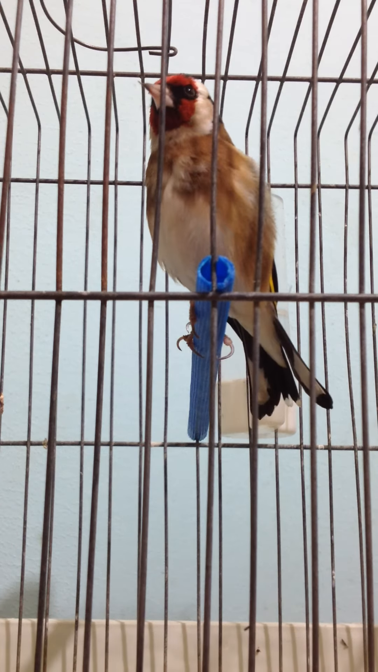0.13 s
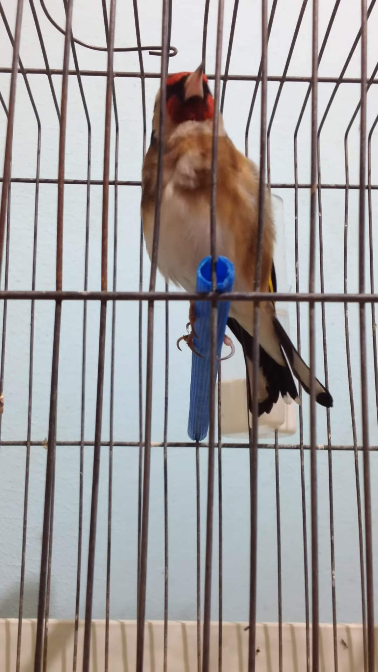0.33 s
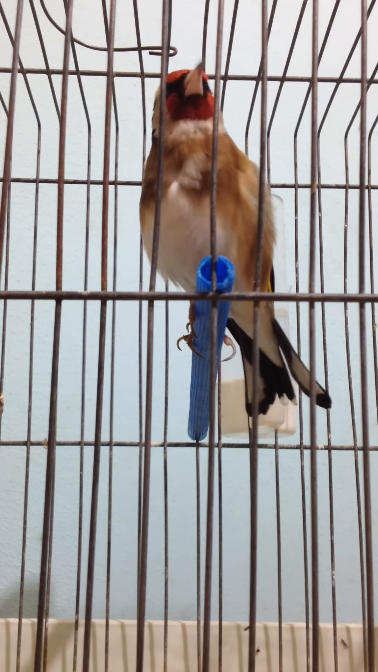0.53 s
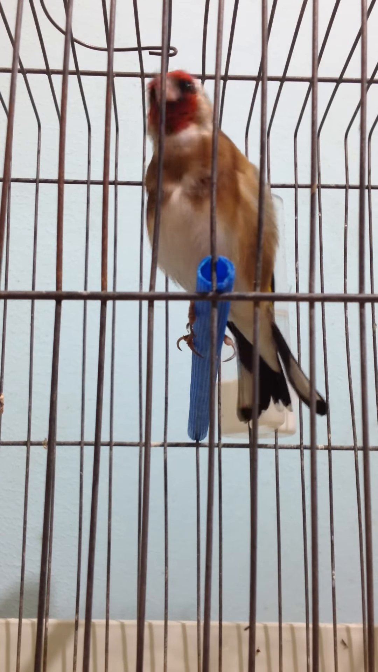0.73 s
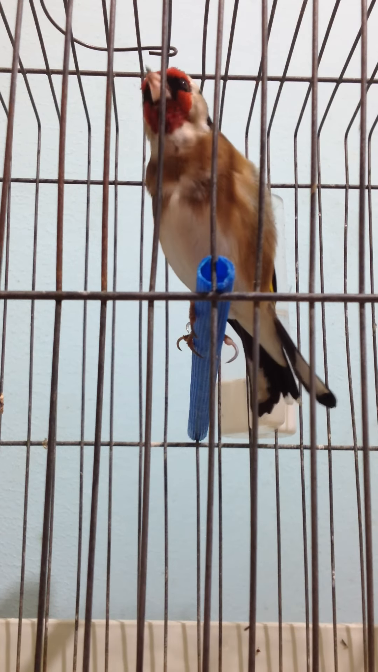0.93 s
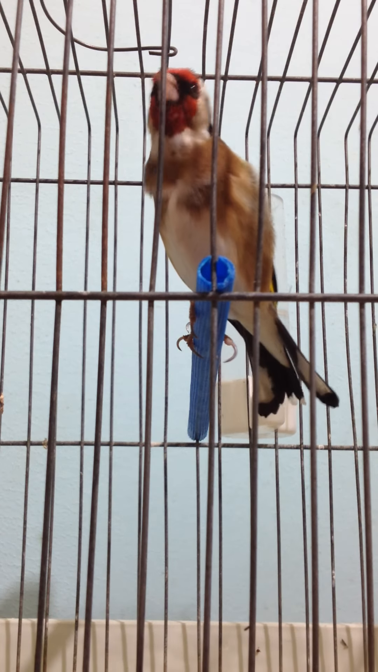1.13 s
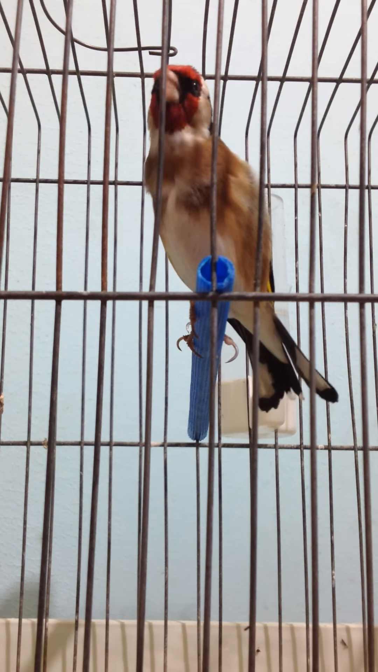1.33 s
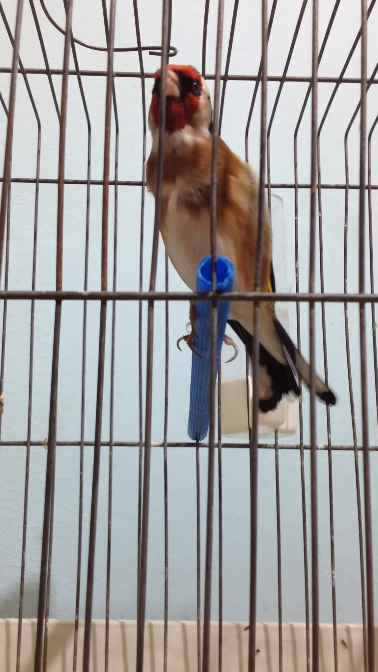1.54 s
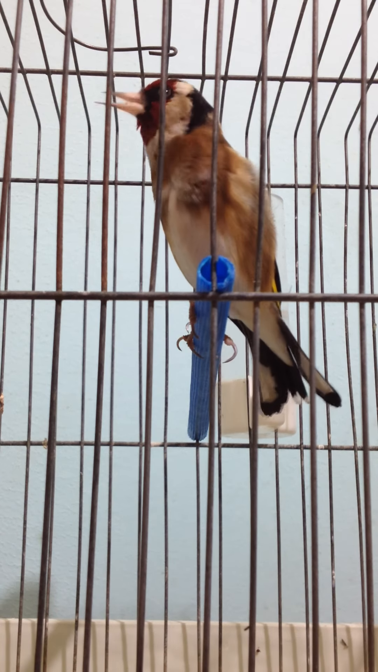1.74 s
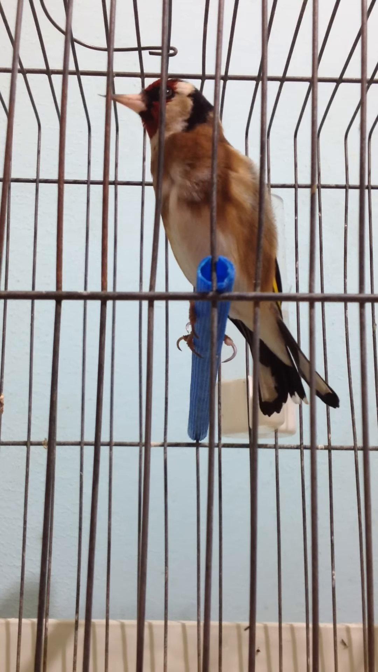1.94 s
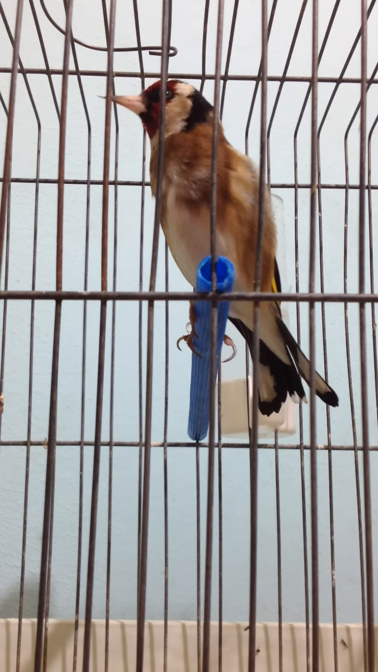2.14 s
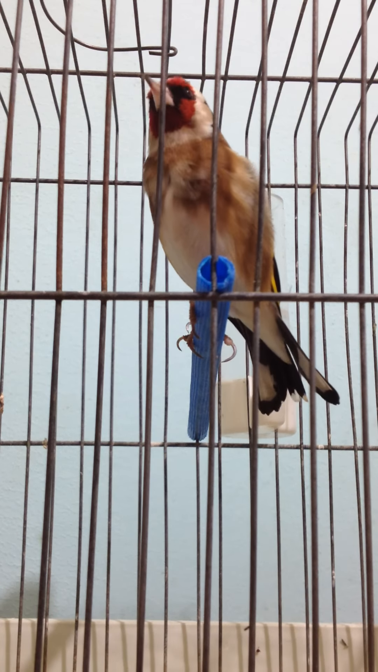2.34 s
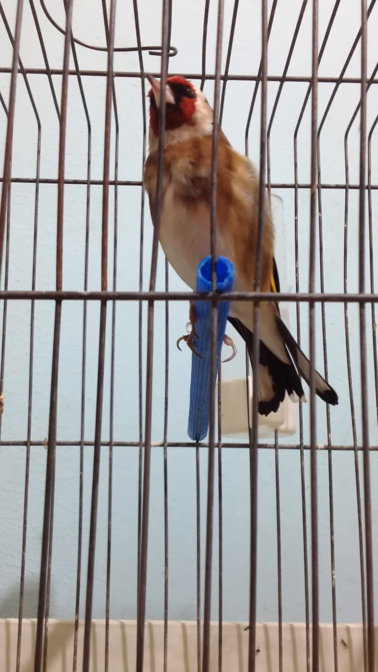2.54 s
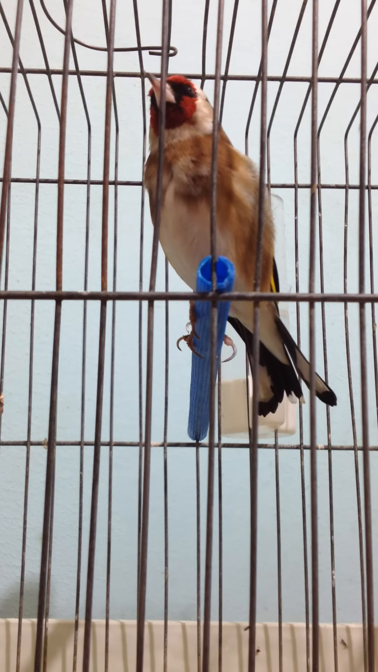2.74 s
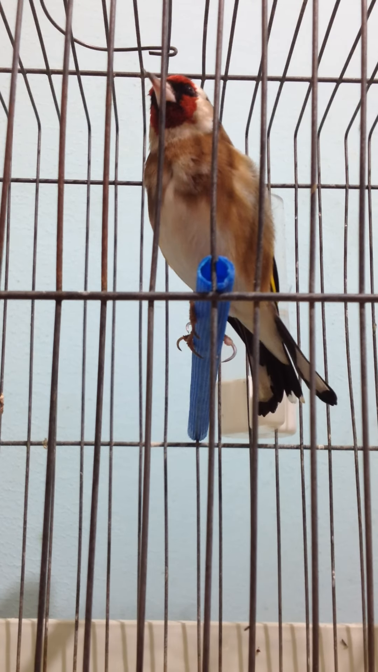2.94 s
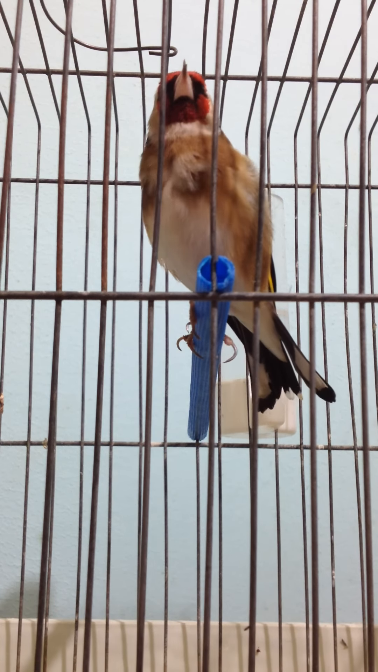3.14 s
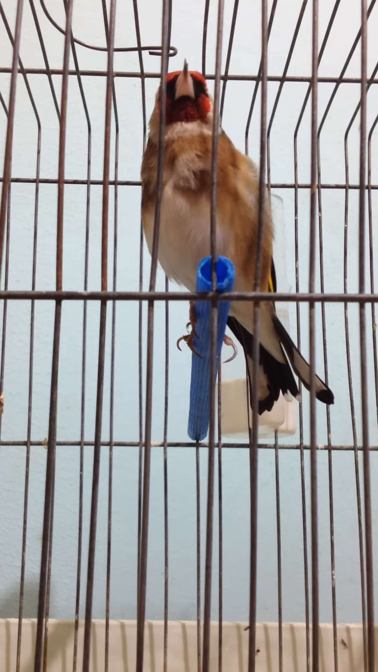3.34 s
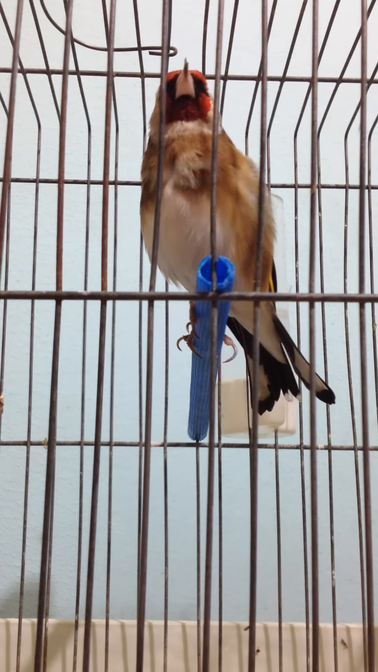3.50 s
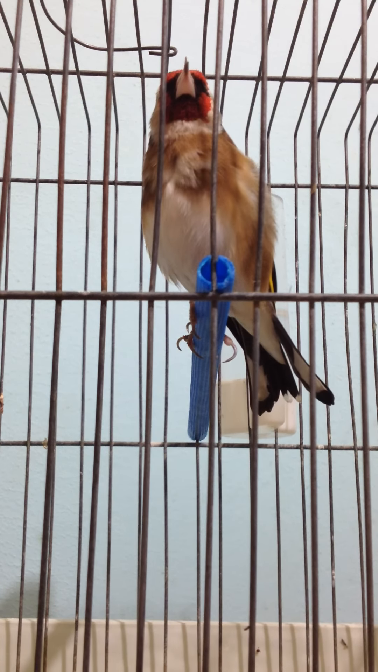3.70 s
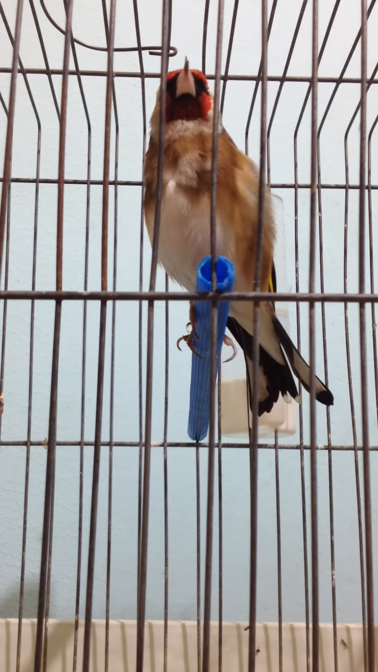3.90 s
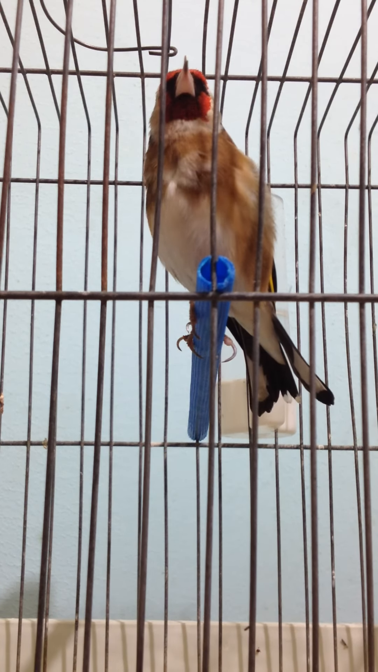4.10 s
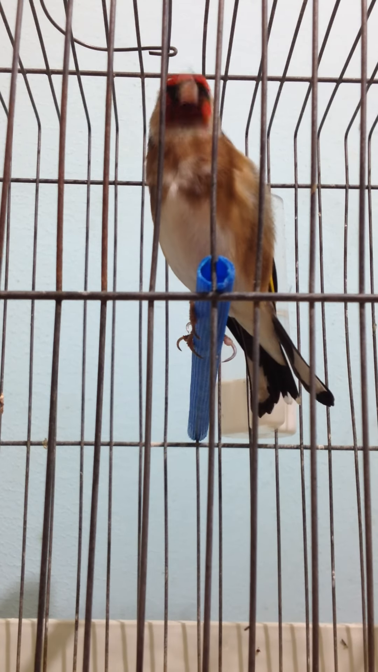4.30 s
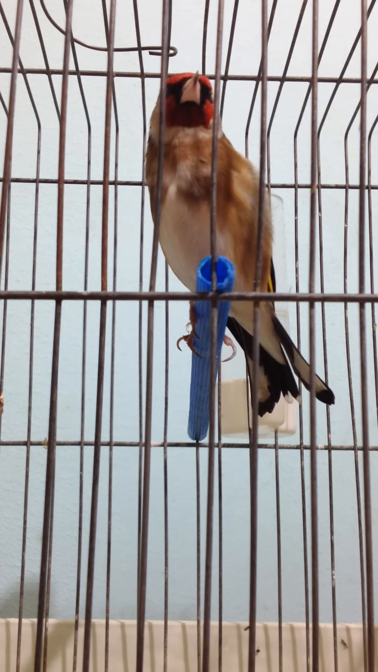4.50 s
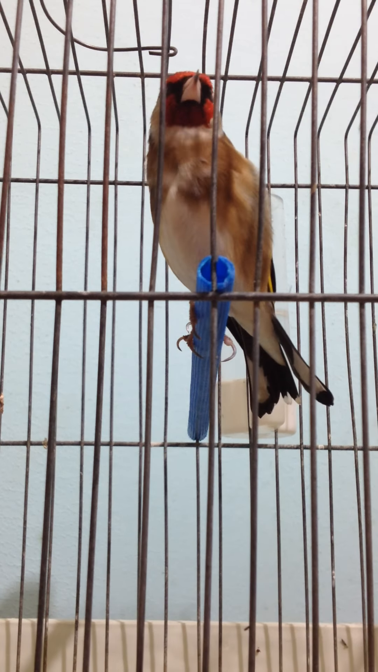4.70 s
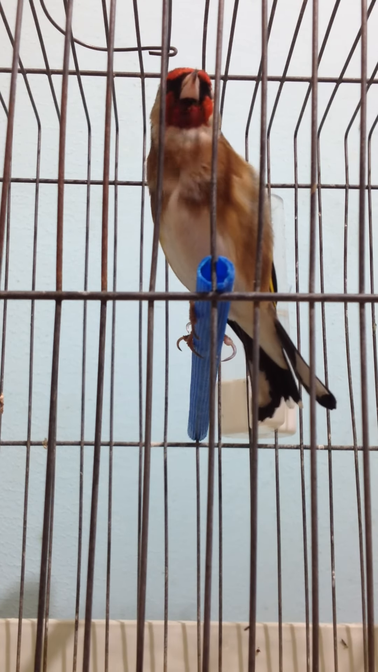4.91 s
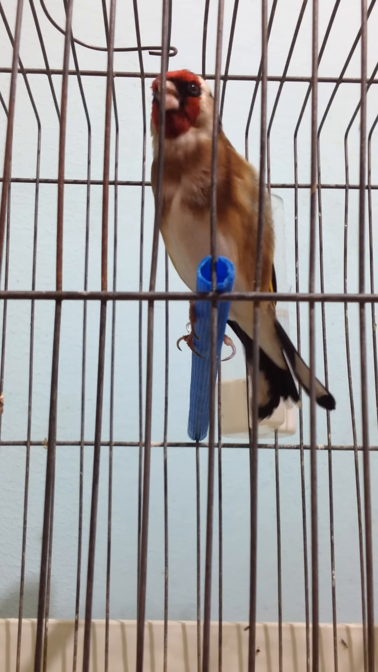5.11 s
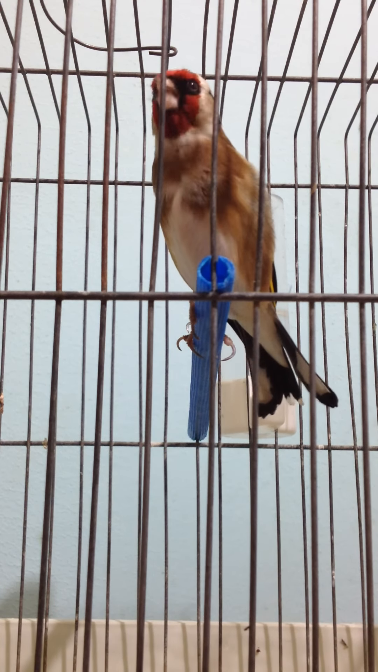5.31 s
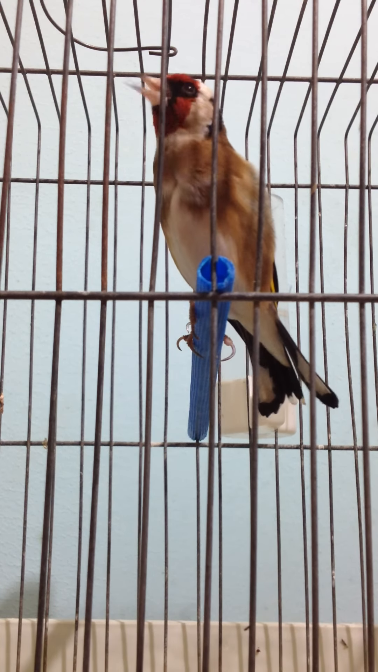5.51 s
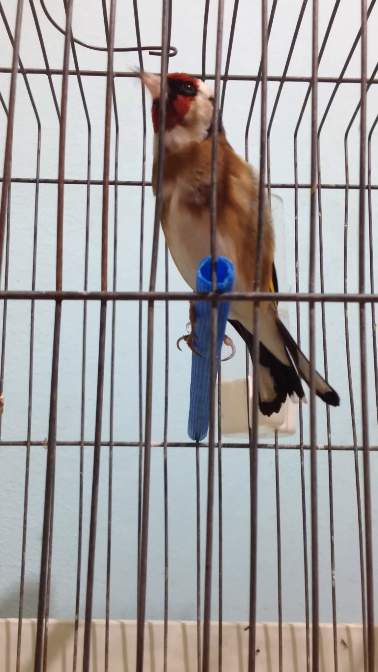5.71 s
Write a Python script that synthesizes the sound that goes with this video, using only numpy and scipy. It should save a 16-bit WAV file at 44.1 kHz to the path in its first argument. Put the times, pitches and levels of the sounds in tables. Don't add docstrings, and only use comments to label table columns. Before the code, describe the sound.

Indoors and close up, a small songbird gives two loud, crisp phrases with short bright reflections. The first is an even run of steeply falling notes and a buzzy finish; the second is a rapid jumble of chirps, rising flicks and double-toned whistles. Between them, far birds twitter from beyond another room, muffled knocks sound and the cage ticks, over soft steady hum.

```python
import sys
import numpy as np
from scipy import signal
from scipy.io import wavfile
from scipy.ndimage import uniform_filter1d

SR = 44100
rng = np.random.default_rng(int(sys.argv[2]) if len(sys.argv) > 2 else 0)


def persist_wave(psi):
    counts = np.round(np.clip(psi, -1, 1) * 32767).astype(np.int16)
    wavfile.write(sys.argv[1], SR, np.atleast_2d(counts).T)


def natural_amplitude(level_db):
    exponent = np.asarray(level_db, float) / 20
    return 10 ** exponent


N = 253575

# (frequency [Hz], density [dB per Hz])
HUM_SPECTRUM = [(20, -68.5), (60, -36.5), (110, -17), (190, -3), (300, -8), (550, -9), (900, -16),
                (1700, -19.5), (3200, -20.5), (7000, -27), (9000, -33), (13000, -26), (16000, -23.5)]

# (time [s], level [dB])
CHATTER = [(0, -85), (.14, -74), (.5, -68.5), (2.0, -65), (2.25, -74), (2.7, -88), (2.95, -88), (3.1, -76),
           (3.9, -69.5), (4.8, -68.5)]
# (frequency [Hz], width [Hz], level [dB])
CHATTER_BANDS = [(4050, 700, -4), (4600, 1200, 0), (5250, 500, -7), (5800, 900, -2), (6500, 450, -6)]
# (time [s], peak [dB], low voice [Hz], high voice [Hz], high voice level [dB])
CHIRPS = [(0.3486, -57, 5140, 5620, 2), (0.4594, -60.5, 4800, 6100, 4), (2.199, -62, 4630, 6060, -11.5),
          (2.2994, -62, 4190, 5490, -12.5), (2.4996, -63.5, 4330, 5550, -1.5),
          (2.8192, -63, 4725, 5850, -6), (3.0486, -64, 3960, 5850, -4.5), (3.1483, -62.5, 4840, 5660, -1.5),
          (3.2987, -55, 4503, 6480, -7.5), (3.5508, -51.5, 4730, 5620, -12.5),
          (3.7797, -51.5, 4580, 6460, -9), (3.9984, -55, 4910, 6070, 5), (4.0789, -50.5, 4150, 5910, -20.5),
          (4.2474, -53, 4140, 6500, -14), (4.4987, -59, 4710, 5880, 6), (4.6478, -60, 4900, 5620, -13),
          (4.7586, -62.5, 4357, 5820, -5.5)]
# (kind, start [s], length [s], from [Hz], to [Hz], level [dB])
WHISTLES = [
    ("ping", .128, .042, 4720, 4800, -51),
    ("ping", .128, .042, 6080, 6500, -50),
    ("far", 3.81, .22, 5800, 6720, -47.5),
    ("far", 4.29, .21, 6100, 6600, -47.5),
    ("sag", 4.36, 0.12, 4040, 3850, -60),
    ("slide", 2.19, .05, 4500, 4500, -64),
    ("climb", 2.25, .1, 4200, 2850, -67),
]

# (time [s], peak [dB], brightness [dB])
KNOCKS = [(0.019, -61.5, -23), (0.269, -61, -4.5), (0.599, -69, -15), (0.713, -64.5, -12),
          (0.919, -61.5, 2), (1.034, -61.5, -4), (1.139, -64, 0), (1.245, -71, -15), (2.276, -58.5, -11.5),
          (2.38, -59, -18), (2.43, -58, -16), (2.499, -68.5, -14), (2.57, -64, -15), (2.613, -60, -4.5),
          (2.68, -64, -15), (3.1, -62, -10), (3.241, -59, -11), (3.319, -59, -6), (3.699, -70.5, -13.5),
          (4.025, -63.5, -9), (4.113, -55, -16.5), (4.147, -51, -11), (4.2, -56, -12), (4.27, -66, -15),
          (4.45, -65, -15)]
# (frequency [Hz], width [Hz], level [dB])
KNOCK_BODY = [(345, 45, 0), (485, 30, 4), (540, 30, -2), (595, 24, 5), (657, 30, 3), (620, 200, -3),
              (925, 70, -5), (1200, 60, -13), (1330, 50, -12), (1790, 110, -15)]
# (time [s], peak [dB])
TICKS = [
    (2.6479, -57),
    (4.5295, -53),
]

FALLS = {"short chord": (5, 1, .35, .5, -12, -16), "slide": (2.1, 1, .6, .75, -7, -15),
         "sag": (2.7, 1, .2, .3, -10, -8), "flick": (2.1, 1, .35, .4, -15, -10),
         "plunge": (.8, 1, .45, .85, -9, -3), "ping": (1.1, 1, .2, .3, -8, -14)}
RISES = {"rise": (1.9, 1, .8, .9, -24, -8), "climb": (1.3, 1, .6, .8, -12, -20),
         "scoop": (2.8, 1, .76, .8, -28, -22), "level": (4, 1, .6, .85, -28, -5),
         "leap": (4.5, 1, .42, .62, -28, -15), "whip": (1.1, 1, .9, .95, -30, -1),
         "jump": (5, 1, .55, .7, -34, -12), "blip": (1.4, 2, .4, .55, -14, -12),
         "far": (2.8, 1.5, .25, .65, -18, -14)}

# (kind, start [s], length [s], from [Hz], to [Hz], level [dB])
UPPER_FIRST = [
    ("whip", .528, .012, 3380, 7600, -16),
    ("short chord", .5355, .025, 6600, 6230, -10),
    ("blip", .638, .011, 4050, 3980, -25),
    ("ping", .651, .011, 4070, 3980, -17),
    ("blip", .737, .008, 6100, 6290, -50),
    ("ping", 1.659, .011, 7850, 7650, -30),
    ("plunge", 1.667, .021, 7750, 5550, -25.5),
]
# (kind, start [s], length [s], from [Hz], to [Hz], level [dB])
UPPER_SECOND = [
    ("ping", 4.823, .011, 4083, 3937, -29),
    ("whip", 4.877, .025, 2330, 2890, -32),
    ("ping", 5.019, .006, 4100, 3900, -28),
    ("whip", 5.243, .016, 1175, 4300, -23),
    ("blip", 5.594, .01, 5950, 6200, -16),
    ("jump", 5.623, .0095, 2750, 4100, -9),
    ("ping", 5.633, .007, 4120, 4000, -13),
    ("blip", 5.723, .011, 5950, 6130, -19),
]
# (kind, start [s], length [s], from [Hz], to [Hz], level [dB])
LOWER_FIRST = [
    ("short chord", .535, .025, 5500, 5065, -20),
    ("climb", .629, .025, 2769, 3850, -18),
    ("leap", .678, .034, 1920, 2155, -37),
    ("rise", 1.498, .059, 1261, 2316, -35),
    ("ping", 1.627, .016, 3120, 3130, -22),
    ("ping", 1.7305, .01, 4500, 4550, -12),
    ("ping", 1.8065, .05, 4100, 3900, -25),
]
# (kind, start [s], length [s], from [Hz], to [Hz], level [dB])
LOWER_SECOND = [("rise", 4.809, .017, 2582, 3400, -17.5), ("ping", 4.8255, .015, 3330, 3880, -18),
                ("scoop", 4.877, .053, 1292, 2560, -24), ("ping", 5.02, .011, 3430, 3456, -19),
                ("blip", 5.252, .017, 1750, 3373, -24), ("whip", 5.352, .008, 1300, 3000, -38),
                ("level", 5.3555, .012, 2800, 3100, -27), ("leap", 5.3675, .017, 2950, 3480, -23),
                ("climb", 5.481, .016, 2650, 2950, -28), ("leap", 5.495, .019, 2900, 3370, -21),
                ("flick", 5.586, .012, 7480, 5459, -10), ("slide", 5.601, .025, 5206, 4300, -9.5),
                ("sag", 5.635, .038, 3600, 2320, -23), ("flick", 5.716, .012, 7305, 5573, -12.5),
                ("slide", 5.728, .03, 5318, 4280, -8)]

# (time from its start [s], pitch [Hz], level [dB])
TRILL_UPPER = [(0.0, 8512, -57), (0.003, 7977, -26.5), (0.007, 6944, -16.5), (0.01, 5985, -5),
               (0.015, 5350, -12), (0.022, 4915, -5), (0.027, 4630, -14.5)]
# (time from its start [s], pitch [Hz], level [dB])
TRILL_LOWER = [(0.002, 4877, -38.5), (0.008, 4686, -16.5), (0.02, 3982, -11.5), (0.026, 3666, -28.5),
               (0.031, 3382, -17), (0.047, 2980, -23.5), (0.061, 2730, -20), (0.072, 2656, -22),
               (0.08, 2663, -28.5)]
# (time [s], upper level [dB], lower level [dB], factor on the top of the upper fall)
TRILL = [
    (.749, 1.5, -.5, 1.025),
    (0.8524, -1.5, 1, .98),
    (.9578, .5, .5, 0.98),
    (1.0643, -1, .5, 0.97),
    (1.1693, -1, 0, 1.01),
    (1.2768, -1, -1, 0.97),
    (1.388, -3, -.5, .98),
]

# (time [s], pitch [Hz], level [dB])
BUZZ_UPPER = [(1.772, 2374, -40), (1.785, 2724, -34), (1.793, 2950, -33), (1.8, 3230, -27),
              (1.808, 3330, -27), (1.815, 3450, -21), (1.825, 3580, -21), (1.85, 3640, -24),
              (1.875, 3650, -27)]
# (time [s], pitch [Hz], level [dB])
BUZZ_LOWER = [(1.77, 1470, -54), (1.778, 2050, -44), (1.79, 2300, -34), (1.8, 2620, -29),
              (1.806, 2800, -32)]
# (time [s], pitch [Hz], level [dB])
STEPPED_DROP = [(1.664, 5700, -45), (1.673, 5200, -28), (1.679, 4960, -10), (1.684, 4890, -5),
                (1.691, 4820, -4.5), (1.698, 4530, -4.5), (1.706, 4485, -6), (1.724, 4487, -11.5),
                (1.731, 4490, -17)]
# (time [s], pitch [Hz], level [dB])
BEAT_UPPER = [(5.291, 4900, -30), (5.298, 4700, -26), (5.305, 4480, -13), (5.315, 4395, -10),
              (5.324, 4420, -11), (5.332, 4450, -22), (5.337, 4450, -32)]
# (time [s], pitch [Hz], level [dB])
BEAT_LOWER = [(5.296, 4600, -30), (5.303, 4330, -15), (5.312, 4215, -11), (5.322, 4235, -11),
              (5.33, 4270, -20), (5.336, 4270, -32)]
# (time [s], pitch [Hz], level [dB])
QUICK_SAG = [(5.379, 6450, -28), (5.384, 6207, -18), (5.389, 5930, -13), (5.398, 5539, -14),
             (5.404, 5460, -11), (5.412, 5430, -15), (5.424, 5440, -21)]
# (time [s], pitch [Hz], level [dB])
STEEP_DROP = [(5.506, 6600, -32), (5.512, 6080, -18), (5.518, 5420, -17), (5.523, 5120, -11),
              (5.529, 4920, -4.5), (5.534, 4760, -9), (5.54, 4650, -6), (5.545, 4600, -11),
              (5.55, 4600, -20)]
# (time [s], pitch [Hz], level [dB])
CHORD_UPPER = [(5.056, 7800, -46), (5.061, 7420, -27), (5.066, 6760, -14), (5.071, 6410, -9.5),
               (5.077, 6270, -8), (5.087, 6280, -8), (5.094, 6260, -24)]
# (time [s], pitch [Hz], level [dB])
CHORD_LOWER = [(5.058, 5880, -45), (5.063, 5380, -29), (5.068, 5130, -17), (5.073, 5070, -11.5),
               (5.08, 5020, -11), (5.086, 5030, -11.5), (5.093, 5060, -30)]
# (time [s], pitch [Hz], level [dB])
HELD_UPPER = [(5.153, 5750, -38), (5.159, 5590, -25), (5.167, 5595, -20), (5.174, 5590, -12),
              (5.184, 5590, -12), (5.194, 5590, -12.5), (5.202, 5580, -23)]
# (time [s], pitch [Hz], level [dB])
HELD_LOWER = [(5.151, 4720, -46), (5.158, 4400, -25), (5.165, 4190, -13), (5.174, 4185, -13),
              (5.184, 4170, -18.5), (5.192, 4160, -21), (5.199, 4170, -32)]
# (time [s], pitch [Hz], level [dB])
SWELL = [(1.573, 2900, -45), (1.582, 3090, -32), (1.59, 3110, -29), (1.597, 3130, -20), (1.604, 3110, -17),
         (1.618, 3140, -19), (1.625, 3130, -34)]
# (time [s], pitch [Hz], level [dB])
SLOW_RISE = [(4.982, 2810, -42), (4.988, 2960, -39), (4.994, 3070, -33), (5.0, 3180, -29),
             (5.006, 3310, -23), (5.013, 3390, -19.5), (5.019, 3440, -24)]

MULTIPLES = [2, 3, 4]
OVERTONES_DB = [-31.5, -42, -47]
MIXES = [(1, -1), (2, -2), (-1, 2), (2, -1), (1, 1), (2, 1), (1, 2)]
MIXES_DB = [-34.5, -41.5, -29, -31, -27, -44, -30]
# (frequency [Hz], gain [dB])
THROAT = [(150, -13), (1000, -10), (3000, 0.5), (4300, 14), (5500, 6), (6500, 14), (8000, -2), (11000, 0),
          (15000, 1.5), (16500, -70)]
# (time [s], depth [0-1])
FLUTTER = [(.55, 0.1), (.645, .3), (.76, 0.09), (1.42, .11), (1.5, .03), (1.79, .07), (1.81, .45),
           (1.87, .2), (4.82, 0.2), (5.07, .08), (5.23, .08), (5.25, .5), (5.275, .4), (5.29, .1),
           (5.75, .08)]
# (time [s], share [0-1])
THROB = [(1.8, 0), (1.815, .9), (1.85, .8), (1.875, .3), (1.88, 0)]
# (time [s], beak [dB], coupling [dB])
BEAK = [(.55, -1.5, 1), (.64, -9, -11), (.69, 2, -11), (.76, -3, -1.5), (1.41, -3.5, -1.5), (1.532, 5, -3),
        (1.6, -12, -1), (1.7, -5, -2.5), (1.829, 2.5, -8.5), (4.82, -3, -3), (4.885, -9, -12),
        (4.92, -5, -5), (5.0, 4, -3), (5.02, 4, -12), (5.08, -6, -3), (5.2, -2, -3), (5.255, -10, -12),
        (5.3, -8, -5), (5.35, -13, -6), (5.401, 5, 1), (5.53, -9, 0), (5.6, -2, 6.5), (5.64, -16, -3),
        (5.73, -5.5, 5)]

# (frequency [Hz], t60 [s])
ROOM_T60 = [(300, 0.12), (2500, 0.23), (4500, 0.23), (7000, 0.18), (12000, 0.22)]
# (delay [s], level [dB])
ECHOES = [(.0009, -50.5), (.0023, -4.5), (.0041, -11), (.0068, -9), (0.0085, -6.5)]


def evened(x):
    return x / np.sqrt(np.mean(x ** 2) + 1e-20)


def read(points, hz):
    f, value = np.transpose(points)
    return np.interp(np.log(np.abs(hz) + 1), np.log(f + 1), value)


def over_time(points):
    return np.interp(np.arange(N) / SR, *np.transpose(points))


def add(mix, s, sound):
    part = mix[round(s * SR):][:len(sound)]
    part += sound[:len(part)]


def band(x, hz, width):
    b, a = signal.iirpeak(hz, hz / width, SR)
    return signal.lfilter(b, a, signal.lfilter(b, a, x))


def hum():
    frames, hz = N // 256 + 5, np.fft.rfftfreq(1024, 1 / SR)
    real, imaginary, patches = rng.standard_normal((frames, 513, 3)).T
    patches = uniform_filter1d(patches, 10, 0)
    patches = evened(uniform_filter1d(patches, 20, 1))
    level_db = read(HUM_SPECTRUM, hz)[:, None] + 1.4 * patches
    spectrum = (real + 1j * imaginary) * natural_amplitude(level_db)
    return natural_amplitude(-70) * evened(signal.istft(spectrum, nperseg=1024, noverlap=768)[1][:N])


def tail(t60_scale, start_s):
    taps = np.zeros(SR)
    at = np.arange(0, SR - 20, 20)
    taps[at + rng.integers(0, 20, len(at))] = rng.choice([-1., 1.], len(at))
    taps *= np.clip(np.arange(SR) / SR / start_s, 0, 1)
    hz, t, z = signal.stft(taps, SR, nperseg=128)
    t60_s = t60_scale * read(ROOM_T60, hz)[:, None]
    out = signal.istft(z * natural_amplitude(-60 * t / t60_s), SR, nperseg=128)[1]
    return out / np.linalg.norm(out)


def note(kind, start_s, length_s, from_hz, to_hz, db):
    bend, turns, swell, hold, onset_db, end_db = (FALLS | RISES)[kind]
    u = np.linspace(0, 1, num=40)
    hz = to_hz + (from_hz - to_hz) * abs(1 - turns * u) ** bend
    swelling_db = onset_db * np.clip(1 - u / swell, 0, 1) ** 2
    sagging_db = end_db * np.clip((u - hold) / (1.01 - min(hold, 1)), 0, 1) ** 1.5
    return np.transpose([start_s + length_s * u, hz, db + (swelling_db + sagging_db)])


def side(sung, edge_s=.002):
    hz, swing = np.full(N, 4000.), np.zeros(N)
    for rows in sung:
        s, f, db = np.transpose(rows)
        at = np.arange(round(s[0] * SR), min(round(s[-1] * SR), N))
        t = at / SR
        hz[at] = uniform_filter1d(np.interp(t, s, f), 90, mode="nearest")
        opening = (t - s[0]) / edge_s
        closing = (s[-1] - t) / .004 + (at[-1] == N - 1)
        fade = np.sin(np.pi / 2 * np.clip(np.minimum(opening, closing), 0, 1)) ** 2
        level_db = uniform_filter1d(np.interp(t, s, db), 90, mode="nearest")
        swing[at] = np.maximum(swing[at], natural_amplitude(level_db) * fade)
    return hz, swing


def far_whistles():
    out = np.zeros(N)
    for row in WHISTLES:
        hz, swing = side([note(*row)], edge_s=.004)
        out += swing * np.sin(2 * np.pi * np.cumsum(hz) / SR)
    return out


def far_chirps():
    out, t = np.zeros(N), np.arange(1300) / SR
    low_fall = np.cumsum(1.12 - .3 * t / t[-1]) * 2 * np.pi / SR
    high_fall = np.cumsum(1.08 - .17 * t / t[-1]) * 2 * np.pi / SR
    for s, db, low_hz, high_hz, high_db in CHIRPS:
        voices = np.sin(low_hz * low_fall) + natural_amplitude(high_db) * np.sin(high_hz * high_fall)
        add(out, s, natural_amplitude(db + 3.5) * np.hanning(len(t)) * voices)
    return out


def chatter():
    noise = rng.standard_normal(N)
    swells_db = 3 * evened(uniform_filter1d(rng.standard_normal((len(CHATTER_BANDS), N)), 3000))
    blur = np.zeros(N)
    for (hz, width, db), swell_db in zip(CHATTER_BANDS, swells_db):
        blur += natural_amplitude(db + swell_db) * band(noise, hz, width)
    stirs = np.zeros(N)
    for s, db, *_ in CHIRPS:
        stirs[round(s * SR)] = natural_amplitude(-69 + .5 * (db + 58))
    settle_t60_s = .7
    stirs = signal.lfilter([1], [1, -natural_amplitude(-60 / (settle_t60_s * SR))], stirs)
    return evened(blur) * (natural_amplitude(over_time(CHATTER) - 3.5) + uniform_filter1d(stirs, 800))


def far_birds():
    whistles = far_whistles()
    chirps = far_chirps()
    blur = chatter()
    reverberant = signal.fftconvolve(whistles + chirps, tail(1.8, .01))[:N]
    return natural_amplitude(-7.0) * whistles + natural_amplitude(-6.5) * reverberant + blur


def knocks():
    out, t = np.zeros(N), np.arange(SR // 2) / SR
    puffs = rng.standard_normal((len(KNOCKS), len(t))) * np.minimum(t / .005, 1)
    for (s, db, bright_db), puff in zip(KNOCKS, puffs):
        ringing = sum(natural_amplitude(gain_db) * band(puff, hz, width) for hz, width, gain_db in KNOCK_BODY)
        body = evened(ringing) * natural_amplitude(-60 * t / .65)
        edge = evened(band(puff, 1700, 2500)) * natural_amplitude(bright_db - 60 * t / 0.32)
        add(out, s, natural_amplitude(db - 2.5) * (body + edge))
    for s, db in TICKS:
        click = evened(np.diff(rng.standard_normal(901)))
        add(out, s, natural_amplitude(db - 6 - 60 * t[:900] / .015) * click)
    return out


def song_notes():
    uppers = [note(*row) for row in UPPER_FIRST + UPPER_SECOND]
    uppers += [BUZZ_UPPER, BEAT_UPPER, QUICK_SAG, STEEP_DROP, CHORD_UPPER, HELD_UPPER]
    lowers = [note(*row) for row in LOWER_FIRST + LOWER_SECOND]
    lowers += [BUZZ_LOWER, BEAT_LOWER, STEPPED_DROP, CHORD_LOWER, HELD_LOWER, SWELL, SLOW_RISE]
    for s, upper_db, lower_db, top in TRILL:
        upper = np.array(TRILL_UPPER) + [s, 0, upper_db]
        lower = np.array(TRILL_LOWER) + [s, 0, lower_db]
        late_s = np.clip(0.0065 * (s - TRILL[0][0]), 0, .005)
        upper[:2, 1] *= top
        lower[0, 0] += late_s
        upper[0, 0] += late_s / 2
        uppers.append(upper)
        lowers.append(lower)
    return uppers, lowers


def syrinx_side(sung, throb):
    hz, swing = side(sung)
    notch_db = -10 * np.exp(-((hz - 5350) / 190) ** 2)
    swing = swing * natural_amplitude(notch_db)
    depth = over_time(FLUTTER)
    shake = evened(band(rng.standard_normal(N), 220, 180))
    hz = hz * (1 + .06 * depth * shake)
    swing = swing * np.clip(1 + 0.41 * depth * np.roll(shake, 40), 0, 3)
    hz = hz * (1 + .025 * throb)
    swing = swing * (1 + .6 * np.roll(throb, 60))
    return hz, swing, 2 * np.pi * np.cumsum(hz) / SR


def goldfinch():
    s, *lifts = np.transpose(BEAK)
    beak_db, coupling_db = (np.interp(np.arange(N) / SR, s, lift) for lift in lifts)
    throb_hz = 118
    throb = over_time(THROB) * np.sin(2 * np.pi * throb_hz * np.arange(N) / SR)
    voices = [syrinx_side(sung, throb) for sung in song_notes()]
    (upper_hz, upper, upper_turn), (lower_hz, lower, lower_turn) = voices
    song = upper * np.sin(upper_turn) + lower * np.sin(lower_turn)
    for hz, swing, turn in voices:
        for k, db in zip(MULTIPLES, OVERTONES_DB):
            song += swing * natural_amplitude(db + beak_db + read(THROAT, k * hz)) * np.sin(k * turn)
    both = np.sqrt(upper * lower)
    for (m, n), db in zip(MIXES, MIXES_DB):
        gain_db = db + coupling_db + read(THROAT, m * upper_hz + n * lower_hz)
        song += both * natural_amplitude(gain_db) * np.sin(m * upper_turn + n * lower_turn)
    return song


def room(x):
    close = np.zeros(600)
    close[0] = 1
    for s, db in ECHOES:
        close[round(s * SR)] += natural_amplitude(db - 14)
    turn = 2 * np.pi * 2.3 * np.arange(N) / SR
    tails = np.zeros(N)
    for facing in (np.sin(turn), np.cos(turn)):
        tails += signal.fftconvolve(x * facing, tail(1.14, .008))[:N]
    return signal.fftconvolve(x, close)[:N] + natural_amplitude(-11) * tails


def scene():
    return (hum() + far_birds() + knocks() + natural_amplitude(1.5) * room(goldfinch()))[None]


def band_limit(x):
    return signal.sosfilt(signal.butter(12, 15810, fs=SR, output="sos"), x)


def record(dry):
    lopsided = signal.sosfilt(signal.butter(3, 105, "high", fs=SR, output="sos"), dry ** 2)
    bent = dry + natural_amplitude(-41.5) * lopsided - natural_amplitude(-31.5) * dry ** 3
    power_db = 10 * np.log10(abs(uniform_filter1d(dry[0] ** 2, 900)) + 1e-12)
    fall = np.arange(N) * 11.0 / SR
    held_db = np.maximum.accumulate(power_db + fall) - fall
    over_db = np.maximum(held_db + 30.0, 0)
    dip_db = 0.07 * uniform_filter1d(over_db, 900)
    return band_limit(bent / natural_amplitude(dip_db))


dry = scene()
out = record(dry)
persist_wave(out)
```